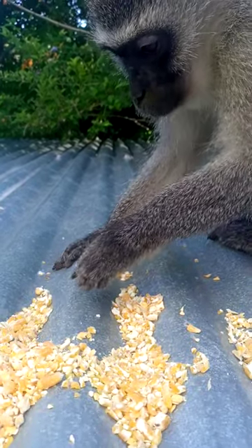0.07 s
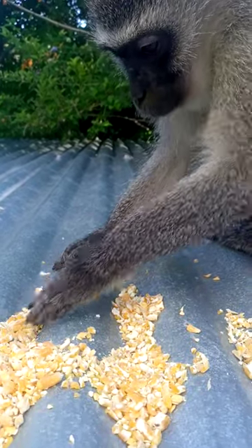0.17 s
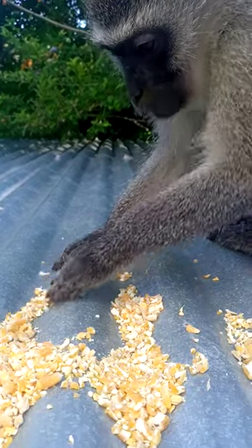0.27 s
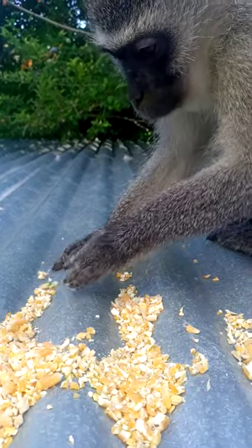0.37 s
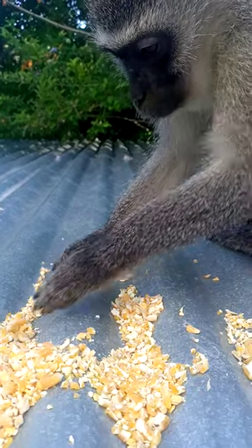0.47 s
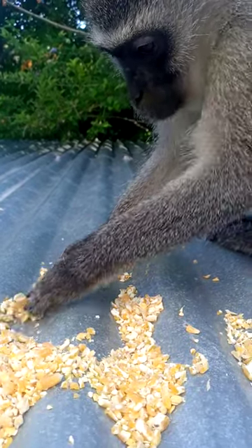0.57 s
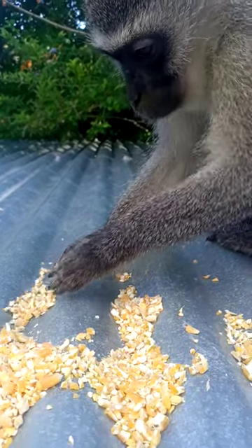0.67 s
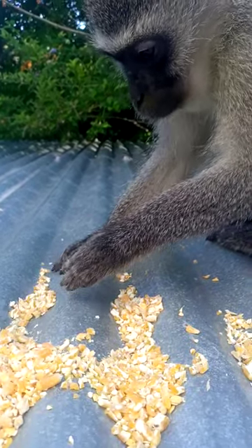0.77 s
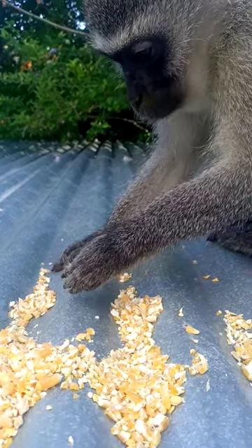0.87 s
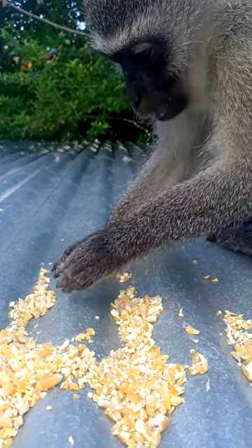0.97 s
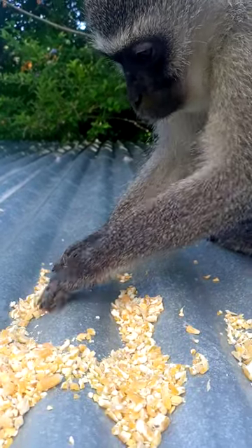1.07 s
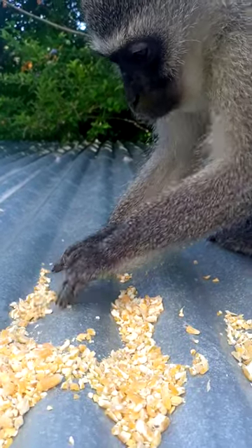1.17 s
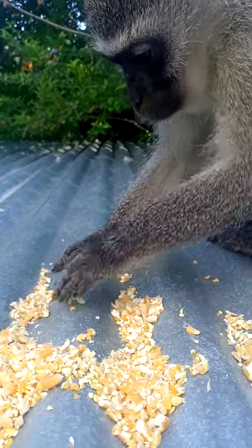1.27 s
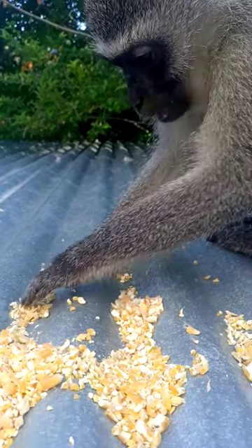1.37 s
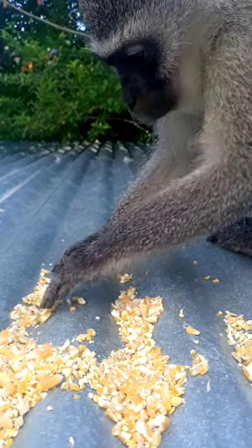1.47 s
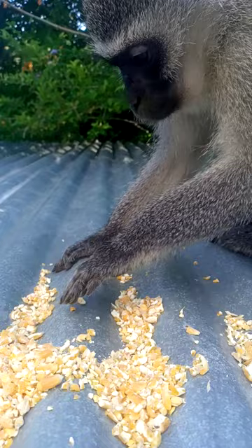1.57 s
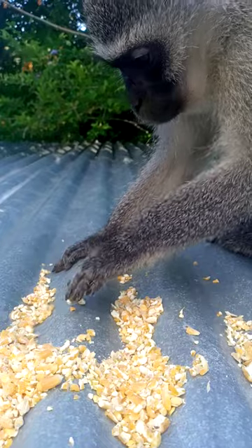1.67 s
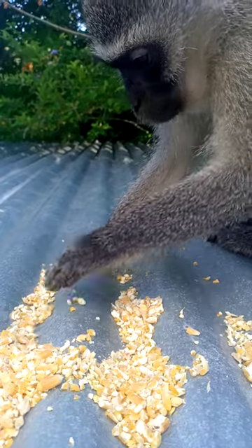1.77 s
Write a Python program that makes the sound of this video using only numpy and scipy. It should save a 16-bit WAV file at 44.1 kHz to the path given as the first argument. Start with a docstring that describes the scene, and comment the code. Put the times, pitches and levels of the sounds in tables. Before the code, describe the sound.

Dried corn scrapes on a metal roof, close. A stroke's faint end and tiny chewing crunches open; gritty strokes with soft bumps and knocks follow at 0.2 and 0.54 seconds, the second densely crackling until 0.8. Faint echoing birds and small crunches fill the gap. A lighter stroke comes at 1.1, a firmer one at 1.4; from 1.67, chewing crunches and a nearer bird whistle over low outdoor rumble.

```python
"""Dried corn is pawed across a sheet-metal roof, close by: the end of one stroke, then four more by a monkey's hand.
Each of the four lands with a soft bump and a knock; showers of tiny grain contacts make its push and drag.
Decaying noise bursts make the kernels' snaps and the small crunches of chewing; the sheet rings faintly.
Gliding tones make birds, most of them far and echoing, over filtered noise: low rumble, distant drone, faint air."""
import sys
import numpy as np
from scipy import signal
from scipy.fft import rfft, irfft, next_fast_len
from scipy.io import wavfile
from scipy.ndimage import uniform_filter1d

SR = 44100
rng = np.random.default_rng(int(sys.argv[2]) if len(sys.argv) > 2 else 0)


def store_pcm(level_fs):
    """Save levels as 16-bit WAV."""
    pcm = np.round(np.clip(level_fs, -1, 1) * 32767).astype(np.int16)
    wavfile.write(sys.argv[1], SR, np.atleast_2d(pcm).T)


N = 81585  # samples in the scene


def amp(db):
    """Decibels to gain."""
    return 10 ** (np.asarray(db) / 20)


def unit(x):
    """Scale to rms 1."""
    return x / np.sqrt(np.mean(x ** 2) + 1e-20)


def along(points, hz):
    """Read (frequency [Hz], level [dB]) points on a log frequency axis."""
    point_hz, level_db = np.transpose(points)
    return np.interp(np.log(hz + 1), np.log(point_hz + 1), level_db)


def curve(rows):
    """Read (time [s], value) points, one value per sample."""
    return np.interp(np.arange(N) / SR, *np.transpose(rows))


def add(out, start_s, x):
    """Mix x into out at a start time, cut at the end of out."""
    i = max(round(start_s * SR), 0)
    out[i:i + len(x)] += x[:max(len(out) - i, 0)]


def colour(x, db_of_hz, size=4096):
    """Minimum-phase filter of unit energy with the given dB shape."""
    cepstrum = irfft(np.log(amp(db_of_hz(np.fft.rfftfreq(size, 1 / SR))) + 1e-6))
    # Folding the cepstrum forward packs the response's energy at its start.
    cepstrum[1:size // 2] *= 2
    cepstrum[size // 2 + 1:] = 0
    response = irfft(np.exp(rfft(cepstrum)))
    return signal.fftconvolve(x, response / np.linalg.norm(response))[:len(x)]


def noise(db_of_hz, size=N):
    """Steady coloured noise of rms 1, with the filter's start-up cut away."""
    return unit(colour(rng.standard_normal(size + 2048), db_of_hz)[-size:])


def dying(t60, size):
    """Exponential decay, 60 dB down after t60 seconds."""
    return amp(-60 * np.arange(size) / SR / t60)


def tail(t60, size):
    """Dying noise of unit energy."""
    decay = rng.standard_normal(size) * dying(t60, size)
    return decay / np.linalg.norm(decay)


def burst(db_of_hz, t60, rise_s, size=4096):
    """A coloured puff that rises quickly and dies, with the energy of its envelope."""
    envelope = dying(t60, size) * (1 - np.exp(-np.arange(size) / SR / rise_s))
    puff = noise(db_of_hz, size=size) * envelope
    return puff * np.linalg.norm(envelope) / np.linalg.norm(puff)


def patchy(x, depth_db):
    """Random gain in small patches of time and pitch gives the scrape a changing colour."""
    spectrum = signal.stft(x, nperseg=512)[2]
    field = rng.standard_normal(spectrum.shape)
    field = uniform_filter1d(field, size=3, axis=0)  # blur across pitch
    field = unit(uniform_filter1d(field, size=5, axis=1))  # blur across time
    gain = amp(depth_db * np.clip(field, -2, 2))
    return unit(signal.istft(spectrum * gain, nperseg=512)[1][:len(x)])


# Base colour of corn on the sheet: (frequency [Hz], relative level [dB])
CORN_COLOUR = [(30, -26), (90, -21.5), (300, -7), (520, -16.5), (1000, -7.5), (1650, -3.5), (2000, -6),
               (2600, -1), (3100, -3), (3800, -5), (4500, -4), (5100, -6.5), (6200, 2), (7350, 2.5),
               (8300, -8.5), (10500, -10.5), (14000, -11), (15200, 5.5), (16000, -11)]


def corn(bass_db, middle_db, treble_db):
    """The colour of corn on metal, tilted in bass, middle and treble for one contact."""
    tilt = [(650, bass_db), (1400, middle_db), (2900, middle_db), (4100, 0), (7500, 0.0046), (12000, treble_db)]
    return lambda hz: along(CORN_COLOUR, hz) + along(tilt, hz)


# Hand strokes across the corn: (time [s], push level [dB], push length [s], drag level [dB],
# drag end after the start [s], release [dB/s], bass tilt [dB], middle tilt [dB], treble tilt [dB])
HAND_STROKES = [(-.06, -49.5, 0.06, -54, 0.074, 149, -17, 2, -7),
                (0.218, -37.5, 0.052, -46, 0.22, 149, -1.5, 3, 1),
                (0.5382, -37, 0.086, -43, 0.19, 195, 6.5, 3, -5.5),
                (1.085, -42, 0.11, -53.5, 0.267, 144, 5.5, 4.5, -5.5),
                (1.398, -37, 0.083, -43, 0.2, 350, 1.5, 2.5, -3)]
ATTACK_S, EASE_DB_PER_S = 0.0089, 231  # the hand lands; the push eases into the drag
GRAINS_PER_S, GRAIN_SPREAD_DB, GRAIN_T60 = 5000, 3.5, 0.0074  # contacts; decay in s


def strokes():
    """The hand pushes, then drags: a dense shower of tiny, quickly dying kernel contacts."""
    out, t = np.zeros(N), np.arange(N) / SR
    for s, push_db, push_s, drag_db, drag_s, release, bass_db, middle_db, treble_db in HAND_STROKES:
        since = t - s
        push = push_db - EASE_DB_PER_S * np.maximum(since - push_s, 0)
        level_db = np.maximum(push, drag_db) - release * np.maximum(since - drag_s, 0)
        grains = np.zeros(N)
        for share in np.full(8, 1 / 8):  # eight kinds of grain, each with its own noise tail
            struck = rng.random(N) < share * GRAINS_PER_S / SR
            strength = amp(GRAIN_SPREAD_DB * np.minimum(rng.exponential(size=N), 4))
            grains += signal.fftconvolve(struck * strength, tail(GRAIN_T60, size=512))[:N]
        rustle = patchy(colour(grains, corn(bass_db, middle_db, treble_db)), depth_db=3.5)
        out += rustle * amp(level_db) * np.clip(since / ATTACK_S, 0, 1)
    return out


# Kernels that snap or strike the sheet: (time [s], envelope level before rise and decay [dB],
# decay t60 [s], middle tilt [dB], treble tilt [dB])
KERNEL_SNAPS = [(0.019, -38, 0.013, -11, 1), (0.2179, -39, 0.028, -3, -13), (0.2239, -27, 0.036, -12, -3),
                (0.245, -29, 0.02, -8, 4), (0.2538, -27.5, 0.011, -13, -11), (0.309, -30, 0.013, -24, 7),
                (.313, -27.5, 0.014, 2, 8.5), (0.336, -34, 0.011, 0, -2), (0.357, -32, 0.025, -11, 1.5),
                (.387, -28.5, 0.02, 0, 1.5), (0.391, -34, 0.016, -3, 3), (0.405, -36, 0.02, -8, -14),
                (0.4253, -30, 0.022, -11, 4.5), (0.446, -37, .025, -10, 2), (0.481, -34, 0.01, -10, 6),
                (.5092, -27, 0.0079, -8, 9), (0.527, -41, 0.025, -14, 6), (0.545, -28, 0.078, -1, -3),
                (0.5737, -27, 0.032, -14, 8), (0.5816, -22.5, 0.012, -10, -5),
                (0.5952, -26, 0.021, 2, -0.5), (0.6211, -23.5, 0.02, -3.5, -13),
                (0.6235, -25, 0.017, 5.5, -7), (0.639, -24, 0.02, 2, 2), (0.6407, -26, 0.025, -1, -8),
                (0.6643, -21, 0.015, -12, 16), (0.6743, -24, 0.024, 2.5, 2.5), (0.7054, -32, 0.016, 6, -3),
                (0.7224, -31.5, 0.013, -6, 17), (0.727, -38, 0.015, 0, -1),
                (0.7671, -27.5, 0.019, -6.5, -1), (0.7818, -34, 0.016, 4, 2),
                (0.8112, -31.5, 0.0057, 4, -27), (1.091, -33, 0.029, 4, 6.5), (1.103, -31.5, 0.029, -6, 1),
                (1.109, -32.5, 0.029, -16, 4), (1.132, -31.5, 0.023, 33, 10), (1.143, -30, 0.037, 6, -7),
                (1.156, -29.5, 0.021, -10, -6), (1.1647, -28, 0.015, -10, -8), (1.1708, -31, 0.018, 9, -6),
                (1.178, -26, 0.015, 3, -18), (1.2118, -37, 0.014, -2, 1), (1.2405, -35, 0.011, -9, 0),
                (1.2577, -40.5, 0.029, -4, -4), (1.265, -31, 0.013, -4.5, -5), (1.283, -41.5, .016, -3, 5),
                (1.3164, -26.5, 0.0048, 12, -4), (1.345, -42.5, .02, 14, -11), (1.3985, -27, 0.037, 2, -18),
                (1.4084, -24.5, 0.026, -9, -4.5), (1.4193, -31, .014, -2, 0), (1.4792, -33, .012, -16, 12),
                (1.492, -27.5, 0.021, 8, 1), (1.531, -33, 0.043, 5.5, -3), (1.5527, -24, 0.0093, 9, -10),
                (1.566, -22.5, 0.018, 6, -8), (1.584, -33.5, 0.036, 7, -20)]


def snaps():
    """Single kernels crack or strike: brief splintering noise, each with its own brightness."""
    out = np.zeros(N)
    for s, db, t60, middle_db, treble_db in KERNEL_SNAPS:
        crack = burst(corn(bass_db=-10.0, middle_db=middle_db, treble_db=treble_db), t60, rise_s=0.00055)
        add(out, s, amp(db) * crack)
    return out


# Ringing modes of the sheet: (frequency [Hz], relative level [dB], decay t60 [s])
SHEET_MODES = [(1704, 6.5, 0.099), (2396, 1.5, 0.18), (2703, 4.5, 0.094), (3010, 5, 0.18), (3550, -1, 0.24),
               (4560, 3, 0.16), (6240, 1.5, 0.17), (7600, 0.5, 0.17)]
RING_DB, WASH_DB, WASH_T60 = -17.5, -14.5, 0.23  # clear modes; noise wash and its decay in s


def sheet(x):
    """The roof rings on in a few clear modes and a wash of dying noise."""
    t = np.arange(SR // 2) / SR
    ring = np.zeros(len(t))
    for hz, db, t60 in SHEET_MODES:
        ring += amp(db) * dying(t60, len(t)) * np.sin(2 * np.pi * (hz * t + rng.random()))
    wash = colour(tail(WASH_T60, len(t)), lambda hz: along([(200, 8.0), (7500, 7), (10000, -21)], hz))
    response = amp(RING_DB) * ring / np.linalg.norm(ring) + amp(WASH_DB) * wash
    return signal.fftconvolve(x, response)[:N]


# Finger knocks as the hand lands: (time [s], level [dB])
FINGER_KNOCKS = [(0.2211, -36.5), (0.543, -29), (1.0897, -39.5), (1.4002, -27)]
# Short modes of each knock: (frequency [Hz], mean relative level [dB], decay t60 [s])
KNOCK_MODES = [(1055, -19, 0.055), (1420, -14, 0.03), (1742, -3, 0.041), (1900, -8.5, 0.048),
               (2714, -5, 0.039), (2940, -7.5, 0.032), (4525, -7.5, 0.051)]


def knocks():
    """Hard fingertips ring the sheet briefly, its modes struck a little differently each time."""
    out, t = np.zeros(N), np.arange(SR // 4) / SR
    for s, db in FINGER_KNOCKS:
        ring = np.zeros(len(t))
        for hz, level_db, t60 in KNOCK_MODES:
            strength = amp(level_db + rng.normal(0, 1.2))
            ring += strength * dying(t60, len(t)) * np.sin(2 * np.pi * (hz * t + rng.random()))
        add(out, s, amp(db) * ring * (1 - np.exp(-t / 0.00025)))
    return out


# Palm and fingers bump the sheet: (time [s], envelope level before rise and decay [dB])
PALM_BUMPS = [(0.221, -48.5), (0.543, -44), (.72, -47.5), (1.096, -54.5), (1.406, -39.5)]
# Colour of a bump: (frequency [Hz], relative level [dB])
BUMP_COLOUR = [(30, -41), (70, 3), (150, -4), (300, 4), (700, 0), (1100, -1.5), (3000, -40)]
BUMP_T60 = 0.11  # s


def bumps():
    """The soft palm thuds on the roof: low, dying noise."""
    out = np.zeros(N)
    for s, db in PALM_BUMPS:
        thud = burst(lambda hz: along(BUMP_COLOUR, hz), BUMP_T60, rise_s=0.0015, size=12000)
        add(out, s, amp(db) * thud)
    return out


# Small crunches of chewing: (time [s], envelope level before rise and decay [dB], centre pitch [Hz])
CHEWING_CRUNCHES = [(0.0671, -42, 8000), (0.0828, -48.5, 6450), (.093, -44.5, 6600), (.929, -51, 7800),
                    (.948, -50, 13500), (1.034, -58, 8300), (1.0673, -47.5, 6900), (1.6797, -47, 5440),
                    (1.716, -49, 7300), (1.736, -53, 7000), (1.7943, -52, 6450), (1.801, -45, 6200),
                    (1.81, -59, 7060), (1.8273, -44, 5000), (1.848, -51, 6800)]
CRUNCH_T60, CRUNCH_WIDTH, CRUNCH_SKIRT_DB = 0.019, 0.51, -19  # s; octaves; broad part under the peak


def chewing():
    """Tiny crunches: dying noise, each gathered around one pitch."""
    out = np.zeros(N)
    for s, db, pitch in CHEWING_CRUNCHES:
        def shape(hz):
            """Corn colour pressed down away from the pitch."""
            distance = np.log2((hz + 1) / pitch) / CRUNCH_WIDTH
            return along(CORN_COLOUR, hz) + CRUNCH_SKIRT_DB * (1 - np.exp(-distance ** 2 / 2))
        add(out, s, amp(db) * burst(shape, CRUNCH_T60, rise_s=0.00028))
    return out


def whistle(points):
    """A clear note: one sine gliding through (time [s], pitch [Hz], level [dB]) points."""
    times, pitch, level_db = np.transpose(points)
    out, t = np.zeros(N), np.arange(times[0], times[-1], 1 / SR)
    hz = np.interp(t, times, pitch)
    tone = unit(np.sin(2 * np.pi * np.cumsum(hz) / SR))
    add(out, times[0], amp(np.interp(t, times, level_db)) * tone)
    return out


# Far bird notes, raspy or clear: (time [s], length [s], start pitch [Hz], end pitch [Hz],
# level before the direct and echo mix [dB], roughness [0-1])
FAR_BIRDS = [(0.801, 0.0506, 3100, 3850, -64.5, 0.62), (0.851, 0.081, 4437, 4290, -64, 0.49),
             (0.843, 0.051, 2930, 2870, -63.5, 0.54), (0.875, 0.0677, 2380, 2694, -64, 0.74),
             (0.928, 0.073, 4660, 5430, -72.5, 0.35), (0.983, 0.028, 950, 948, -66.5, 0.12)]
# The nearer bird's falling whistle: (time [s], pitch [Hz], level [dB])
FALLING_WHISTLE = [(1.672, 4490, -69), (1.71, 4080, -65.5), (1.734, 3890, -55.5), (1.755, 3800, -65),
                   (1.78, 3870, -79)]
# Its short rising call: (time [s], pitch [Hz], level [dB])
RISING_CALL = [(1.833, 5200, -66), (1.84, 5800, -53), (1.847, 6200, -64)]
BIRD_WAVER_HZ = 302  # rms pitch waver at full roughness
BIRD_DIRECT_DB, NEAR_ECHO_DB, BIRD_T60 = -0.5, -5.5, 0.86  # far direct; near into echo; decay in s


def birds():
    """Far notes are blurred by echoes among trees; a nearer bird whistles clearly."""
    far = np.zeros(N)
    for s, length, start_hz, end_hz, db, rough in FAR_BIRDS:
        u = np.linspace(0, 1, int(length * SR))
        waver = unit(uniform_filter1d(rng.standard_normal(N), size=60))[:len(u)]
        hz = start_hz + (end_hz - start_hz) * u + BIRD_WAVER_HZ * rough * waver
        note = np.sin(np.pi * u) * np.sin(2 * np.pi * np.cumsum(hz) / SR)
        add(far, s, amp(db) * unit(note))
    near = whistle(FALLING_WHISTLE) + whistle(RISING_CALL)
    echoes = signal.fftconvolve(far + amp(NEAR_ECHO_DB) * near, tail(BIRD_T60, SR // 2))[:N]
    return near + amp(BIRD_DIRECT_DB) * far + echoes


# Colours of rumble, distant drone and air: (frequency [Hz], relative level [dB])
RUMBLE_COLOUR = [(20, -23), (45, -29.5), (80, -1.5), (130, 0), (185, 2), (250, -7), (400, -19),
                 (600, -52.5), (2000, -74)]
DRONE_COLOUR = [(300, -35.5), (550, -20), (780, -12.5), (960, -2), (1100, -14), (1230, -9.5), (1450, -36),
                (3000, -42)]
AIR_COLOUR = [(200, -19), (1500, -2), (3000, 0.5), (5000, 3), (7300, 5), (8500, -16), (14000, -37),
              (15500, 3.5)]
# Their loudness over time: (time [s], level [dB])
RUMBLE_LOUDNESS = [(0, -56.5), (.08, -64.5), (.17, -57.5), (.23, -73), (.38, -76), (.45, -65.5), (.52, -72),
                   (.62, -63), (.68, -84), (.76, -55.5), (.8, -73), (.86, -60.5), (.97, -59.5),
                   (1.04, -63.5), (1.48, -65.5), (1.58, -55), (1.7, -65), (1.78, -66), (1.85, -73)]
DRONE_LOUDNESS = [(0, -69.5), (.5, -71), (.9, -68), (1.0, -69.5), (1.06, -72.5), (1.6, -62.5), (1.8, -64.5),
                  (1.85, -66.5)]
AIR_LOUDNESS = [(0, -72), (.12, -65), (.21, -72.5), (.9, -65.5), (1.66, -60), (1.76, -68.5), (1.85, -62.5)]


def outdoors():
    """A low rumble, a far wavering drone and faint air: coloured noise that swells and dips."""
    rumble = amp(curve(RUMBLE_LOUDNESS)) * noise(lambda hz: along(RUMBLE_COLOUR, hz))
    drone = amp(curve(DRONE_LOUDNESS)) * noise(lambda hz: along(DRONE_COLOUR, hz))
    air = amp(curve(AIR_LOUDNESS)) * noise(lambda hz: along(AIR_COLOUR, hz))
    return rumble + drone + air


def scene():
    """Corn on the roof, with the garden behind."""
    kernels = strokes() + snaps()
    roof = kernels + sheet(kernels) + knocks() + bumps()
    return (roof + chewing() + birds() + outdoors())[None]


TOP_HZ = 15800  # band limit


def record(dry):
    """Nothing is kept above the band limit."""
    size = next_fast_len(N + SR // 2)
    kept = np.fft.rfftfreq(size, 1 / SR) < TOP_HZ
    return irfft(rfft(dry, size) * kept, size)[..., :N]


dry = scene()
out = record(dry)
store_pcm(out)
```